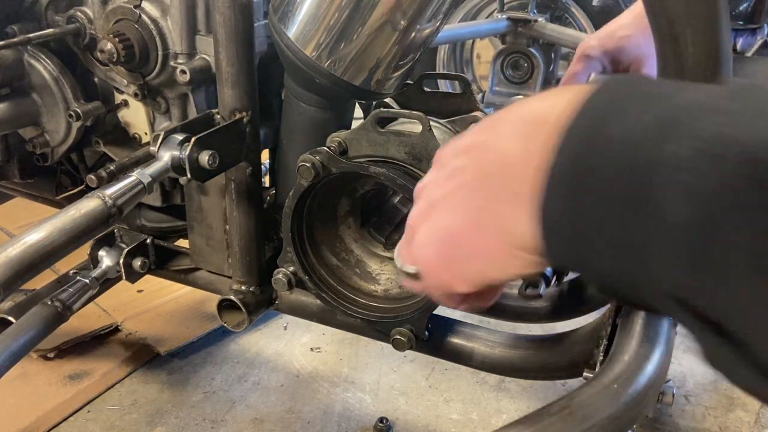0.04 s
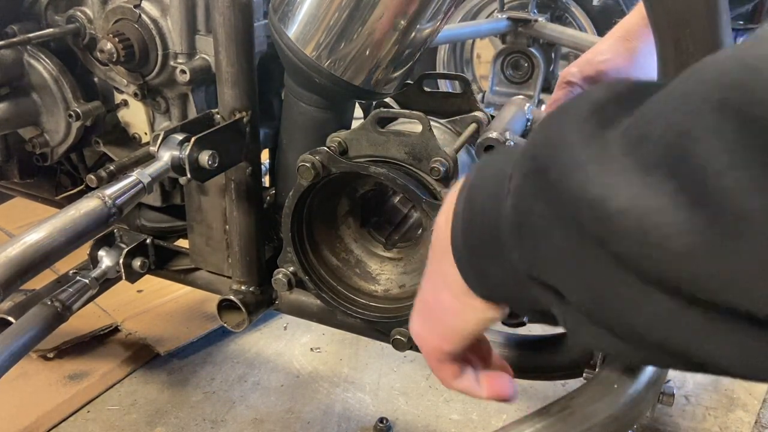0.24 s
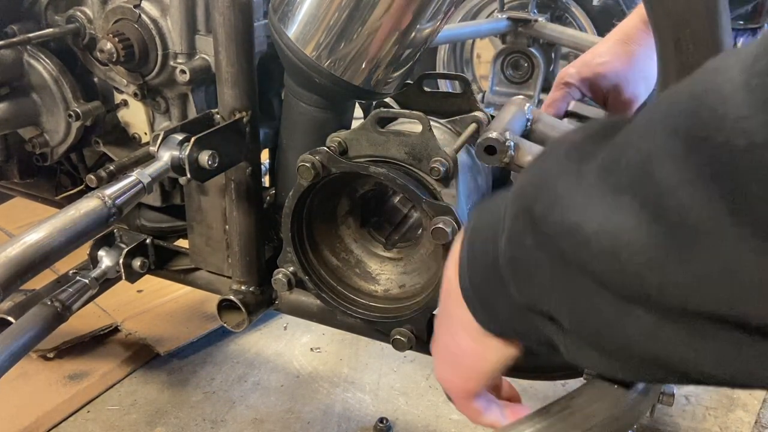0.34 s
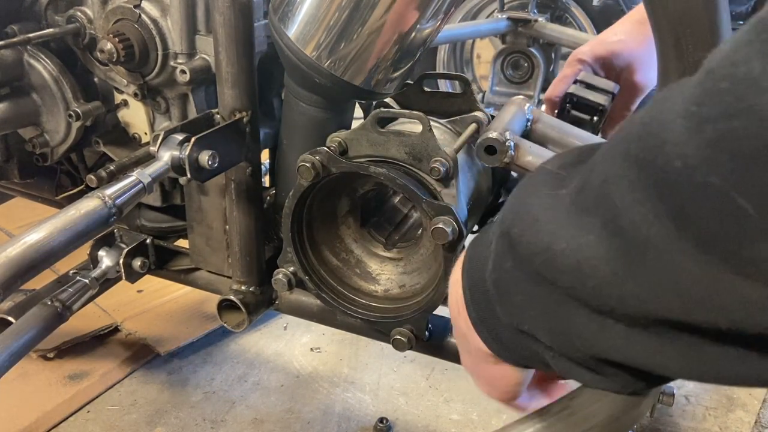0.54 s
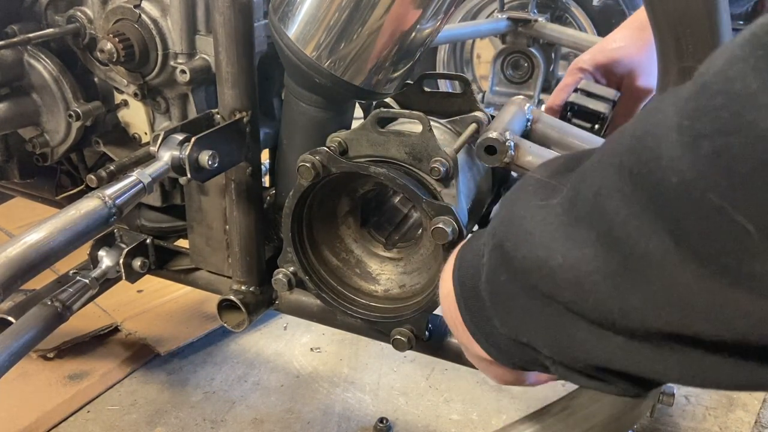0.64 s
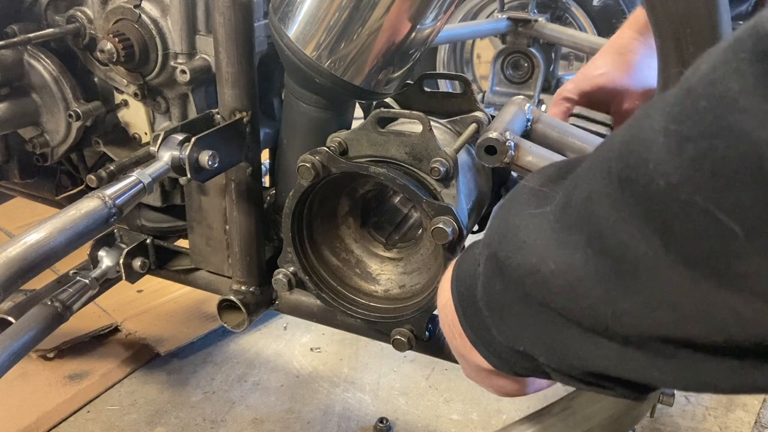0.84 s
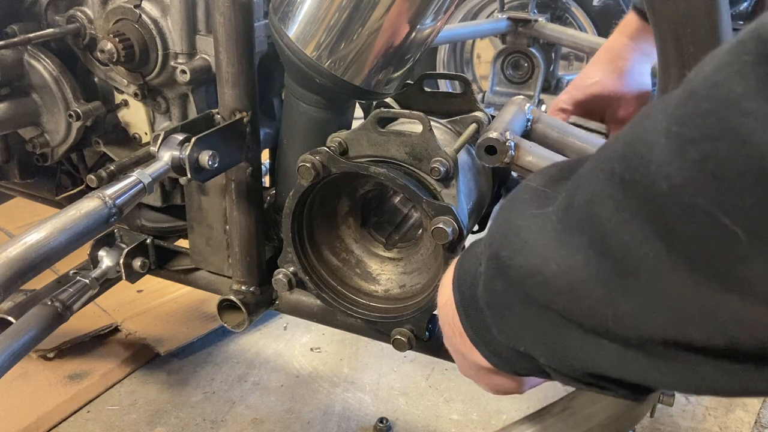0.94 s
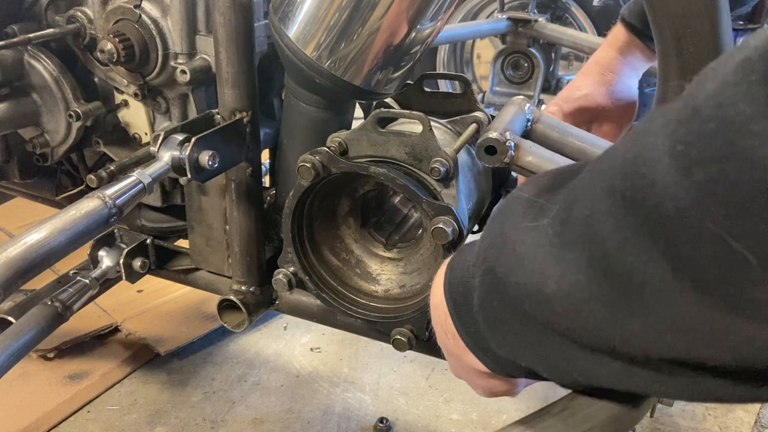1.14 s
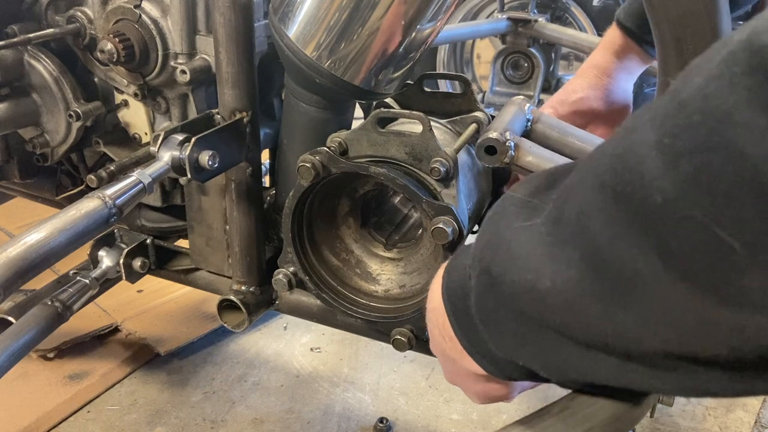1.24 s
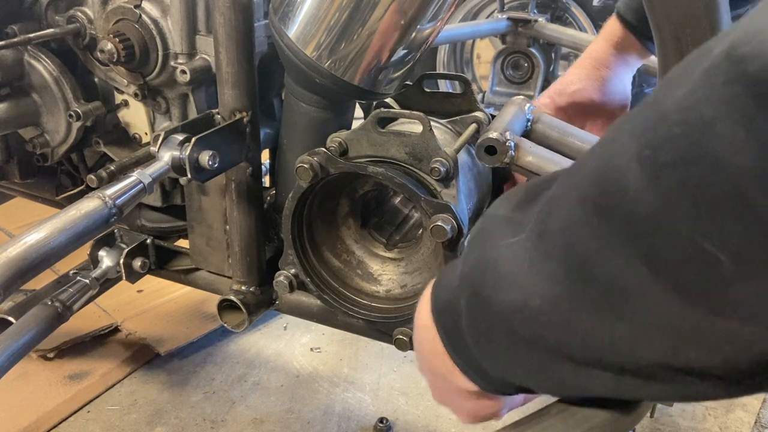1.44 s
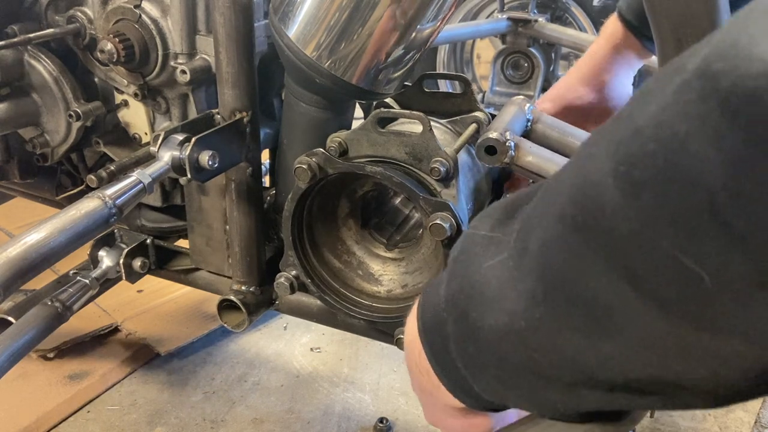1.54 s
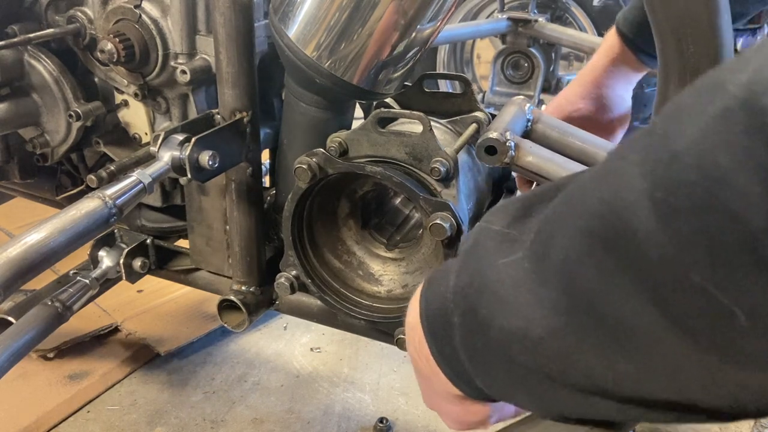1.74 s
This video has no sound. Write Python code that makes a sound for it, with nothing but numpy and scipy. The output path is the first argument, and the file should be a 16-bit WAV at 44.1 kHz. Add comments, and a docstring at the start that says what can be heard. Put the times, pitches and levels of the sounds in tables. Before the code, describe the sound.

Close up in a garage, irregular metal knocks and clinks come from a jack being shifted against steel tubing. A sharp first hit leads to more short, ringing knocks and lighter clicks, with quiet scraping in between.

```python
"""A scissor jack is shifted and knocked against a steel tube frame in a garage, close to a phone's mics.
Each knock is a burst of contact chatter, mostly a few ms long, that rings the frame and the jack's arms;
a hollow thud follows, and a short room tail. Between knocks the parts rub, rumble and bump softly,
with one brief squeak near the start. Faint room tone lies underneath."""
import sys
import numpy as np
from scipy import signal
from scipy.fft import rfft, irfft
from scipy.io import wavfile
from scipy.ndimage import uniform_filter1d

SR = 44100
rng = np.random.default_rng(int(sys.argv[2]) if len(sys.argv) > 2 else 0)


def int16_out(signal):
    """Quantize to a 16-bit WAV file."""
    q = np.round(np.clip(np.atleast_2d(signal).T, -1, 1) * 32767)
    wavfile.write(sys.argv[1], SR, q.astype(np.int16))


N = 79380

# rubbing (time [s], deep rumble [dB], rumble [dB], scrape [dB], hiss [dB], top hiss [dB],
# singing [dB re scrape])
RUB_LEVELS = [(0.0, -52, -49.5, -60.5, -57.5, -69, -7), (0.134, -61, -75, -55.5, -69, -81, -8),
              (0.254, -43.5, -62, -57, -47.5, -72, -13), (0.36, -50.5, -48, -59.5, -53, -60, 7.5),
              (0.44, -61, -55, -55.5, -63.5, -80.5, -8), (0.516, -57, -45, -39, -59, -57, -2),
              (0.58, -48.5, -38, -47, -47.5, -70, 5), (0.716, -65, -61, -62, -66.5, -82, -1.5),
              (0.832, -51, -47, -43, -49, -78, -17), (0.946, -42, -45.5, -65, -54, -63.5, -8),
              (1.052, -63, -43, -75, -69.5, -82, 1), (1.218, -57, -46.5, -48.5, -58, -61.5, -7.5),
              (1.318, -50.5, -45, -52, -62, -70.5, -4.5), (1.432, -69, -48, -52, -56.5, -64, -7),
              (1.564, -46.5, -52.5, -53, -48.5, -66, -7), (1.648, -54, -45.5, -64, -59, -74, 0),
              (1.728, -63, -51, -63.5, -65, -77, 6), (1.8, -65, -41, -58, -61, -83, 8)]
# spectra of the five rubbing noises, each (frequency [Hz], relative level [dB])
DEEP_SPECTRUM = [(15, -34), (25, -2), (70, -13), (113, 4.5), (150, 4.5), (200, -9), (330, -120)]
RUMBLE_SPECTRUM = [(76, -21), (130, -15.5), (162, -1.5), (221, -2), (318, -13), (404, -4), (600, -54.5),
                   (780, -49), (1320, -120)]
SCRAPE_SPECTRUM = [(240, 7), (400, -2), (991, 2.5), (1290, -9.5), (1370, 7), (1850, -15.5), (2400, -26),
                   (3120, -56), (5280, -120)]
HISS_SPECTRUM = [(1180, -60), (2000, -2), (5950, -10.5), (6570, -8.5), (8000, -10.5), (10400, -37),
                 (17600, -120)]
TOP_HISS_SPECTRUM = [(6000, -30), (8500, -3), (11500, 7), (15000, -3.5), (16500, -17)]
# modes of the jack's arms and of the tube frame (frequency [Hz], relative level [dB], t60 [s])
ARM_MODES = [(1830, -7, .33), (1950, 0, .22), (2028, -3, .15), (3311, -10, .28), (4212, -9, .12),
             (4740, -14, .2), (5210, -24, .9), (5380, -5, .2), (6365, -1, .09), (7214, -14, .14),
             (14600, -16, .2)]
FRAME_MODES = [(739, -22.5, 0.26), (884.4, -10, 0.44), (976, -5.5, 0.18), (1149, -0.5, 0.074),
               (1215.5, 0.5, 0.051), (1328, -13.5, 0.45), (1635, -13.5, 0.37), (2750, -4.5, 0.075),
               (2850, -12, 0.081), (3180, -5.5, 0.12), (3934, -7.5, .09), (5100, -15, 0.074),
               (6750, -14, 0.13)]
# soft bumps (time [s], relative level [dB], pitch [Hz])
BUMPS = [(.005, -38.5, 296), (0.039, -45.5, 96), (0.059, -37.5, 280), (0.216, -29.5, 228), (.255, -30, 221),
         (1.042, -37.5, 203), (1.101, -40, 196.5), (1.235, -30, 205), (1.666, -43, 195.8)]
# partials of the squeak (frequency [Hz], level [dB])
SQUEAK_PARTIALS = [(700, -64.5), (1460, -55), (2120, -62), (2400, -64)]
# blows on the frame, levels relative (time [s], level [dB], thud [dB], chatter at 1, 2.5, 5.5 and
# 11 kHz [dB], contact length [ms], thud pitch [Hz], thud t60 [s], frame ring [dB], arm ring [dB],
# tail [dB], two pitches that the place of the blow favours [Hz])
KNOCKS = [(0.125, -1, -16, -14, -16, -13.5, -15.5, 6.7, 181, 0.1, -27.5, -53, -7.5, 743, 3240),
          (.457, -14.5, -26, -12.5, -16, -13.5, -23.5, 6.8, 203, 0.097, -27, -43, -7, 881, 3185),
          (.511, -6.5, -31.5, -15, -12.5, -6, -14.5, 5.1, 199, 0.23, -31.5, -22.5, -9.5, 947, 2960),
          (.776, -8, -17.5, -17, -17, -8.5, -16, 9.3, 184.9, .14, -25.5, -37.5, -4.5, 980, 2850),
          (1.008, -21, -38.5, -15.5, -16.5, -14, -23.5, 11.7, 188.2, .1, -28, -54, -3, 1373, 2660),
          (1.227, -39.5, -36, -6, -28, -18, -32, 48, 195, 0.089, -17, -15, 2.5, 980, 900),
          (1.344, -39.5, -46, -2, -11, -42, -40, 5.6, 205, 0.13, -29.5, -40, -9.5, 1150, 2740),
          (1.5035, -9, -18.5, -14.5, -11, -15.5, -25.5, 8.4, 190.4, 0.058, -25, -43, -9, 1200, 3280),
          (1.513, -12, -41.5, -12.5, -21, -4.5, -13, 2.3, 243, 0.218, -51, -40, -16, 5600, 6800),
          (1.627, -25, -28, -10, -8, -53, -40, 4.9, 195, 0.045, -33.5, -40, -11.5, 1200, 1657),
          (1.746, -19, -41, -10, -12.5, -21, -23.5, 6.4, 203, .1, -29, -42, -7, 1690, 2670),
          (1.774, -28.5, -30.5, -10.5, -9.5, -39, -23, 5.8, 210, 0.06, -28, -42, -5, 1230, 3330)]
# bands of the chatter (frequency [Hz])
CHATTER_BANDS = [350, 1000, 2500, 5500, 11000, 16000]
# decay of the dense ringing and the garage (frequency [Hz], t60 [s])
TAIL_DECAY = [(100, 0.6), (260, 1), (700, 0.58), (1840, 0.32), (4850, 0.24), (12800, 0.21)]
# stereo width at the phone (frequency [Hz], side gain [dB])
SIDE_COLOUR = [(40, -2.5), (150, -5), (300, 0), (640, 1.5), (1400, 5.5), (3000, 2), (7000, 0.5),
               (16000, -42)]
# level between the microphone ports (frequency [Hz], left minus right [dB])
PORT_BALANCE = [(60, 1.5), (150, .3), (380, 1.5), (700, 2), (1290, .7), (2380, 2.7), (4400, 4), (8120, .7),
                (15000, -.7)]
# phase between the ports (frequency [Hz], left lead [rad])
PORT_PHASE = [(20, 0), (250, .1), (860, .9), (1120, .5), (2150, .2), (3190, .3), (7150, .1), (8530, -2.8),
              (9470, -3.2), (10400, -6), (11700, -6.4), (12500, -8.9), (13900, -9.8), (14600, -12.4),
              (16200, -12.6)]


def undb(db):
    return 10 ** (np.asarray(db) / 20)


def unit(x):
    return x / np.sqrt(np.mean(x ** 2))


def fade(t, t60):
    return 1000. ** (-t / t60)


def along_hz(n, table):
    """A (Hz, value) table read at the bins of an n-point spectrum."""
    hz, values = np.array(table, float).T
    return np.interp(np.log(np.arange(n // 2 + 1) * SR / n + 1), np.log(hz + 1), values)


def colour(x, table):
    """Filter by a (Hz, dB) table."""
    return irfft(rfft(x) * undb(along_hz(x.shape[-1], table)), x.shape[-1])


def butter(x, order, hz, kind):
    return signal.sosfilt(signal.butter(order, hz, kind, fs=SR, output="sos"), x)


def add(out, start_s, x):
    i = int(start_s * SR)
    out[..., i:i + x.shape[-1]] += x[..., :N - i]


def walk(rate_hz):
    """A glide from one random value to the next."""
    hold = int(SR / rate_hz)
    return 2 * uniform_filter1d(np.repeat(rng.standard_normal(N // hold + 1), hold), hold)[:N]


def room_tone():
    """Steady faint air of the garage; mid and side."""
    return undb(-67.5) * unit(colour(rng.standard_normal((2, N)), [(20, -27), (60, 5), (16000, -52)]))


def steel_ring(table, t, scatter_db, favoured=(), max_t60=9, split=.009):
    """Each mode of the steel is a close trio that beats; the place of a blow favours some pitches."""
    hz, db, t60 = np.repeat(np.array(table, float), 3, axis=0).T[:, :, None]
    level_draw, split_draw, phase_draw = rng.standard_normal((len(hz), 3)).T[:, :, None]
    flank = np.tile([-1, 0, 1], len(table))[:, None]
    favour_db = sum(8 * np.exp(-(np.log2(hz / pitch) / .07) ** 2) for pitch in favoured)
    db = db - 5 * np.abs(flank) + scatter_db * level_draw + favour_db
    hz = hz * (1 + split * flank * (1 + 0.32 * split_draw))
    envelope = undb(db) * fade(t, np.minimum(t60, max_t60))
    return (envelope * np.sin(2 * np.pi * hz * t + np.pi * phase_draw)).sum(0)


def rubbing(side_db=-7.5, held_t60=.12):
    """Sliding parts rumble, scrape and hiss, and their grit sets the arms singing; mid and side."""
    t = np.arange(N) / SR
    times, *levels = np.array(RUB_LEVELS).T
    deep, rumble, scrape, hiss, top_hiss, singing = (undb(np.interp(t, times, db)) for db in levels)
    grit = rng.standard_normal((2, N)) * undb(walk(110))
    wavering = rng.standard_normal((2, N)) * undb(3 * walk(25.45))
    # a gripping hand shortens the ring
    held_arms = steel_ring(ARM_MODES, t[:6000], scatter_db=1, favoured=[1830], max_t60=held_t60)
    steel = unit(signal.fftconvolve(butter(grit[0], 2, 3900, "low"), held_arms)[:N])
    out = deep * unit(colour(rng.standard_normal((2, N)), DEEP_SPECTRUM))
    out += rumble * unit(colour(wavering, RUMBLE_SPECTRUM))
    out += scrape * unit(colour(grit, SCRAPE_SPECTRUM))
    out += hiss * unit(colour(grit, HISS_SPECTRUM))
    out += top_hiss * unit(colour(grit, TOP_HISS_SPECTRUM))
    out[0] += scrape * singing * steel
    out[1] *= undb(side_db)
    return out


def thud(t, db, hz, t60, lag_s=.0068, rise_s=.0012):
    """A hollow low ring that swells in just after contact, with a longer wavering boom."""
    late = np.maximum(t - lag_s, 0)
    narrow_noise = unit(butter(rng.standard_normal(len(t)), 2, [hz - 33, hz + 33], "band"))
    boom = narrow_noise * undb(-12.5) * fade(late, t60=0.43)
    ring = np.sqrt(2) * np.sin(2 * np.pi * hz * late) * fade(late, t60)
    return undb(db + 3.5) * (1 - np.exp(-late / rise_s)) ** 2 * (ring + boom)


def bumps(t):
    """Soft contacts that sound only the thud; mid, with a silent side."""
    out = np.zeros((2, N))
    for start_s, db, hz in BUMPS:
        add(out[0], start_s, thud(t, db, hz, t60=0.12))
    return out


def squeak(length_s=.05):
    """Sliding steel squeaks: a few wavering partials under one swell."""
    t = np.arange(int(length_s * SR)) / SR
    wavering_t = np.cumsum(1 + .006 * walk(101)[:len(t)]) / SR
    partials = sum(2 * undb(db) * np.sin(2 * np.pi * hz * wavering_t) for hz, db in SQUEAK_PARTIALS)
    return np.sin(np.pi * t / length_s) * partials


def chatter_spectrum(levels):
    """Four band levels, extended by a weaker band at each end, as a (Hz, dB) noise spectrum."""
    band_db = np.array([levels[0] - 7, *levels, levels[-1] - 8])
    density_db = band_db - 10 * np.log10(np.array(CHATTER_BANDS) / 2500)
    return [(100, density_db[0] - 20)] + list(zip(CHATTER_BANDS, density_db))


def chatter(t, contact_s, spectrum, scatter_db=3):
    """Steel chatters on steel: a short, uneven burst of noise."""
    progress = t / contact_s
    grain = undb(scatter_db * np.repeat(rng.standard_normal(len(t) // 32), 32))
    touch = rng.standard_normal(len(t)) * grain * np.minimum(progress / 0.2, 1) * np.exp(-progress ** 4)
    touch *= np.sqrt(contact_s * SR / np.sum(touch ** 2))
    return butter(colour(touch, spectrum) * (progress < 3), 3, 600, "high")


def tail(t, spectrum, comb):
    """Dense ringing and garage reverb: half-octave noise bands dying at their own rates; mid and side."""
    noise_bins = rfft(colour(rng.standard_normal((2, len(t))), spectrum)) * comb
    hz = np.arange(len(t) // 2 + 1) * SR / len(t)
    decay_hz, decay_t60 = np.array(TAIL_DECAY).T
    out = 0
    for centre in 280 * 2 ** (np.arange(13) / 2):
        t60 = np.interp(np.log(centre), np.log(decay_hz), decay_t60)
        window = np.clip(1 - np.abs(2 * np.log2((hz + 1) / centre)), 0, 1)
        early = undb(3) * fade(t, t60 * 0.19)
        out = out + irfft(noise_bins * window, len(t)) * (fade(t, t60) + early)
    return out * (1 - np.exp(-t / 0.0029))


def knocks(t, ripple_db=2.5, ripple_hz=60):
    """The jack strikes the frame: chatter, ringing frame and arms, thud and tail; mid and side."""
    out = np.zeros((2, N))
    ripple = uniform_filter1d(rng.standard_normal(len(t) // 2 + 1), int(ripple_hz * len(t) / SR))
    comb = undb(ripple_db * unit(ripple))  # dense unresolved modes comb the tail
    prompt = 1 + undb(6.5) * fade(t, t60=0.015)  # the frame loses this boost while the parts still touch
    for start_s, db, thud_db, *blow in KNOCKS:
        spectrum = chatter_spectrum(blow[:4])
        contact_ms, thud_hz, thud_t60, frame_db, arm_db, tail_db, *favoured = blow[4:]
        contact_s = contact_ms / 1000
        contact = chatter(t, contact_s, spectrum)
        frame = undb(frame_db) * steel_ring(FRAME_MODES, t, scatter_db=3, favoured=favoured) * prompt
        arms = undb(arm_db) * steel_ring(ARM_MODES, t, scatter_db=0.81)
        ring = (frame + arms) * (1 - np.exp(-t / (0.23 * contact_s)))
        tail_mid, tail_side = undb(tail_db) * tail(t, spectrum, comb)
        gain = undb(db + 6.5)
        add(out[0], start_s, gain * (contact + ring + tail_mid) + thud(t, thud_db, thud_hz, thud_t60))
        add(out[1], start_s, gain * undb(-4.5) * tail_side)
    return out


def scene():
    """Jack and frame close up, the garage behind; left and right."""
    ring_t = np.arange(2 ** 15) / SR
    mid, side = knocks(ring_t) + bumps(ring_t) + rubbing()
    add(mid, .044, squeak())
    room_mid, room_side = room_tone()
    mid = mid + room_mid
    side = colour(side + room_side, SIDE_COLOUR)
    return np.array([mid + side, mid - side])


def record(dry, top_hz=15700):
    """Two microphone ports hear with their own level and lag; deep bass and top are cut, peaks rounded."""
    half = undb(along_hz(N, PORT_BALANCE) / 2) * np.exp(.5j * along_hz(N, PORT_PHASE))
    ports = irfft(rfft(dry) * np.array([half, 1 / half]), N)
    rounded = np.tanh(butter(ports, 3, 38, "high"))
    return signal.sosfilt(signal.ellip(10, .2, 80, top_hz, fs=SR, output="sos"), rounded)


dry = scene()
out = record(dry)
int16_out(out)
```